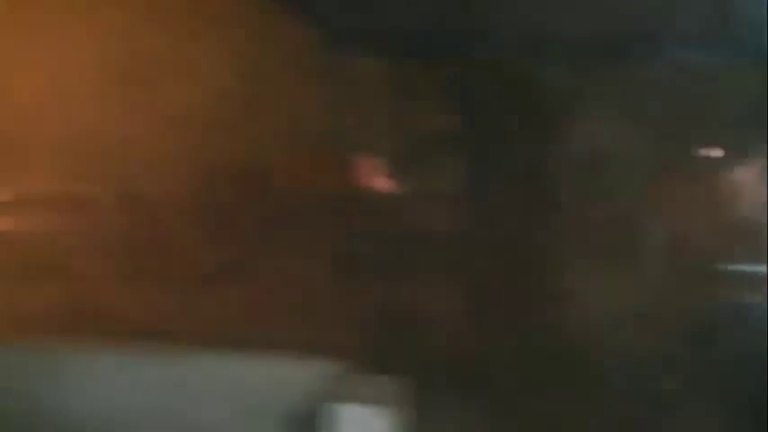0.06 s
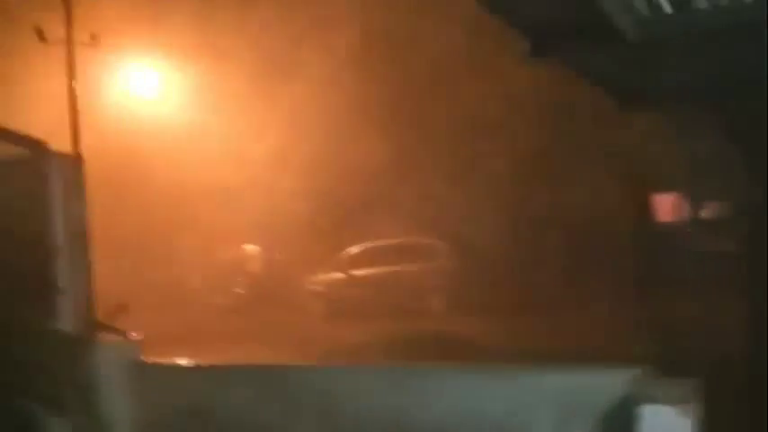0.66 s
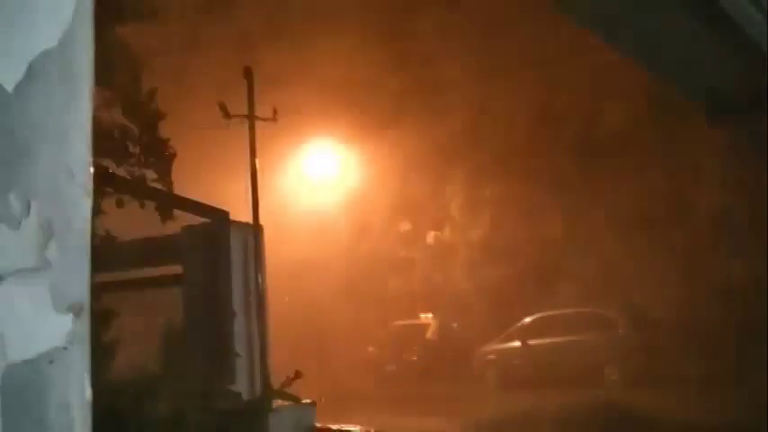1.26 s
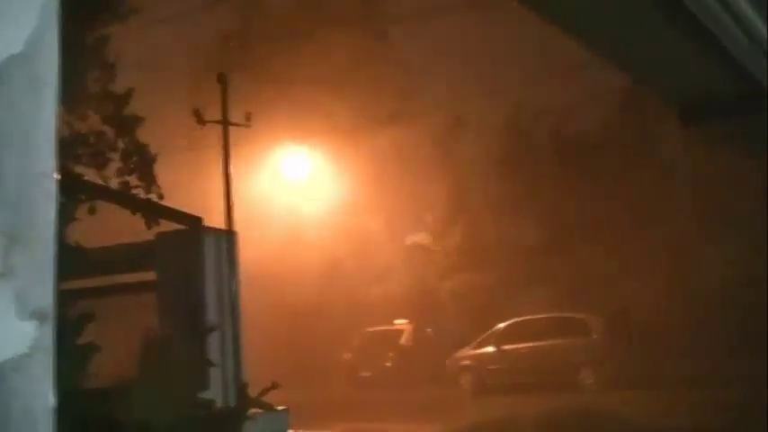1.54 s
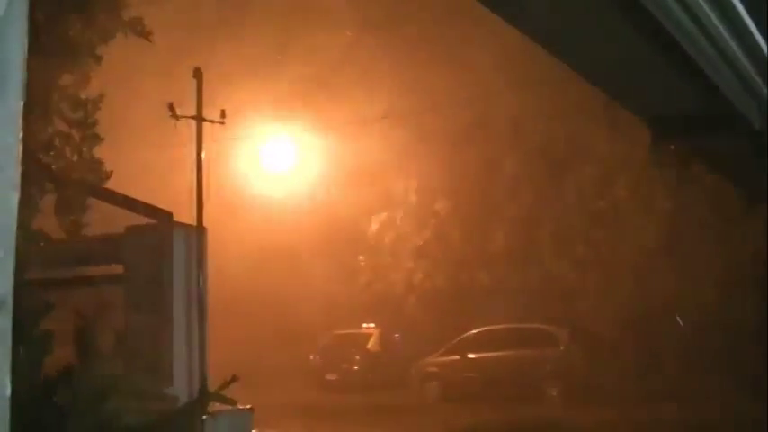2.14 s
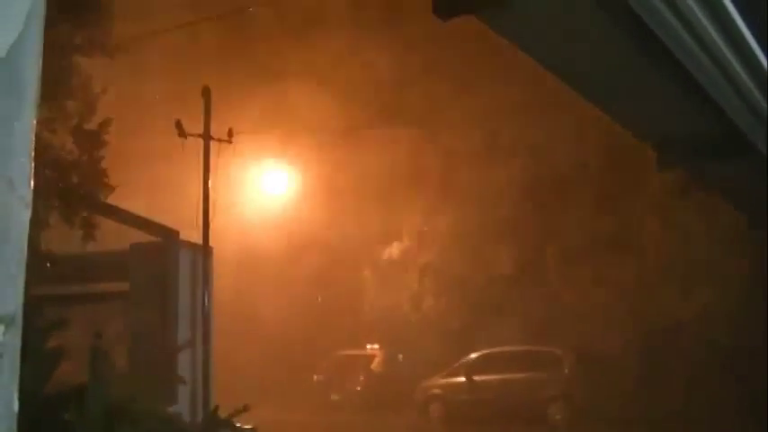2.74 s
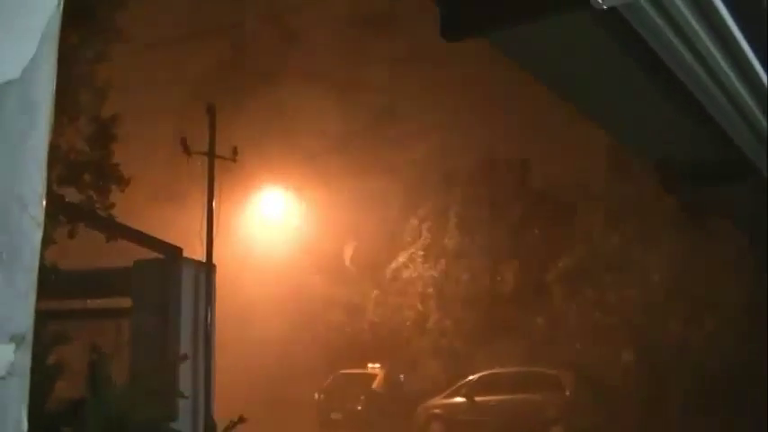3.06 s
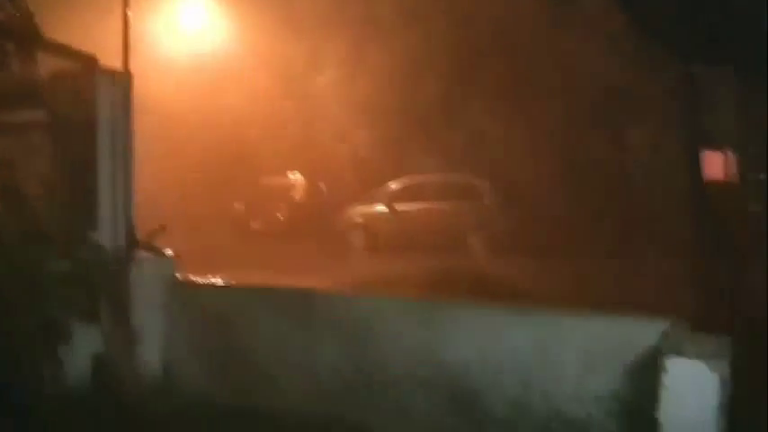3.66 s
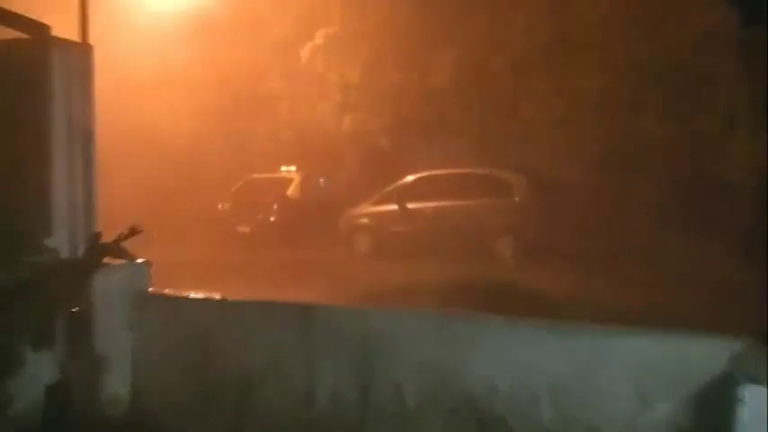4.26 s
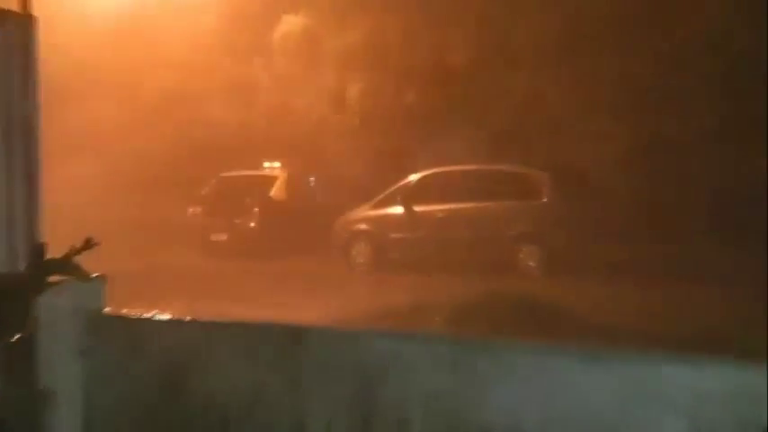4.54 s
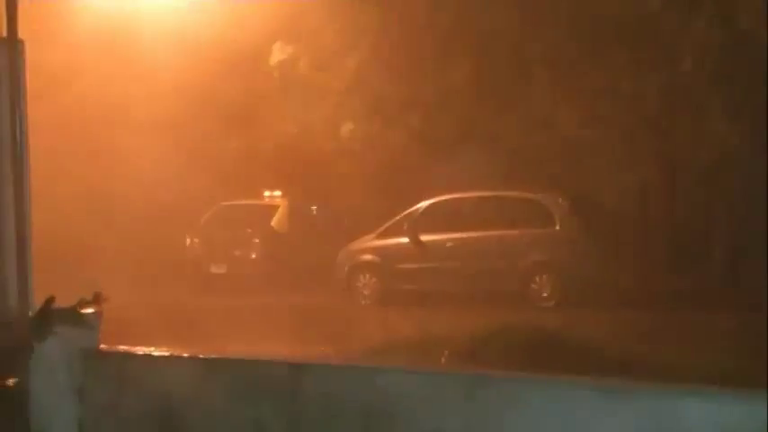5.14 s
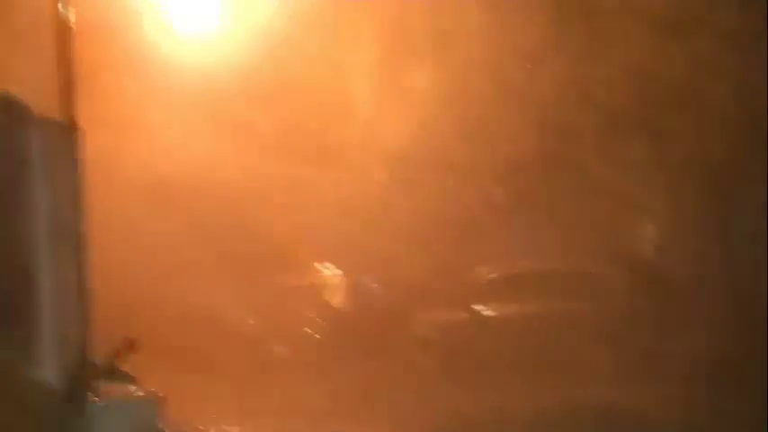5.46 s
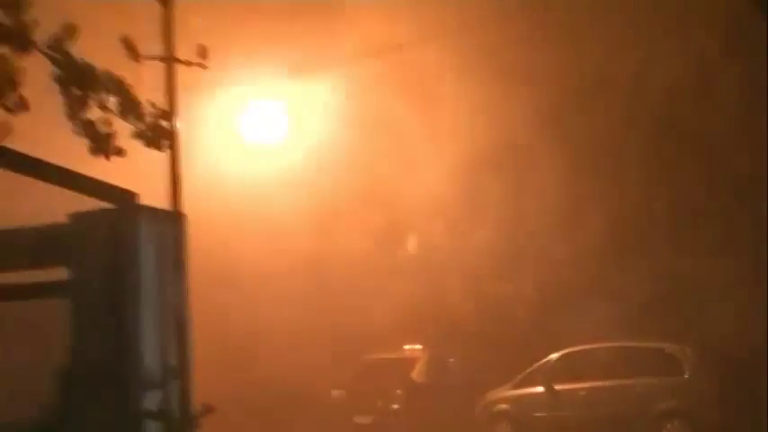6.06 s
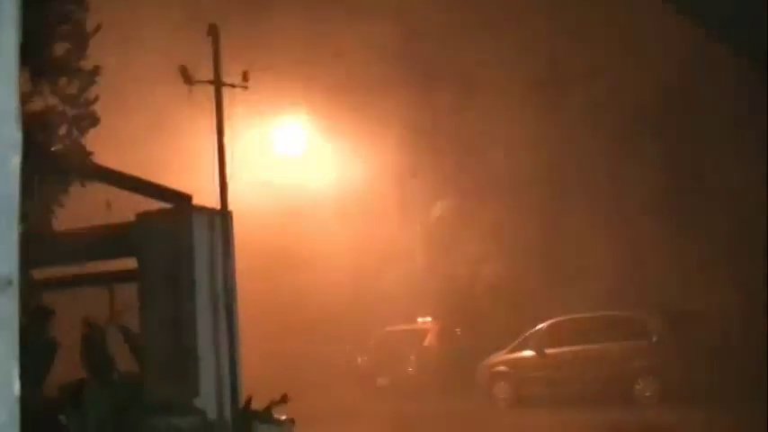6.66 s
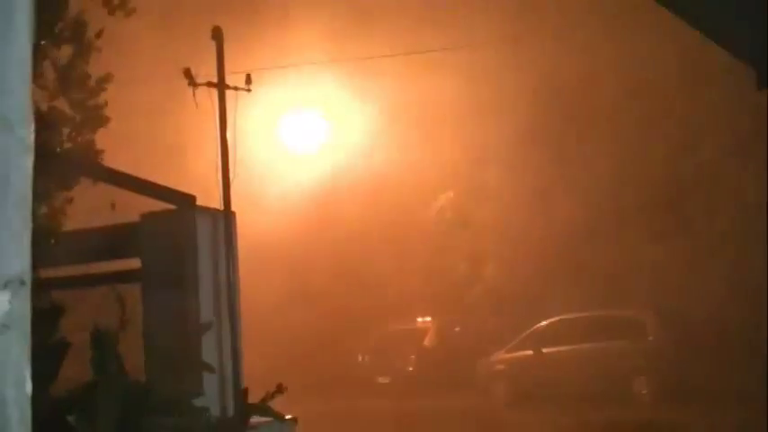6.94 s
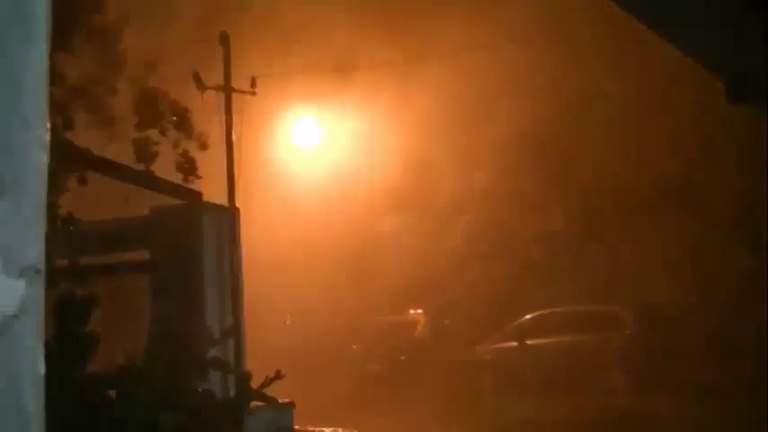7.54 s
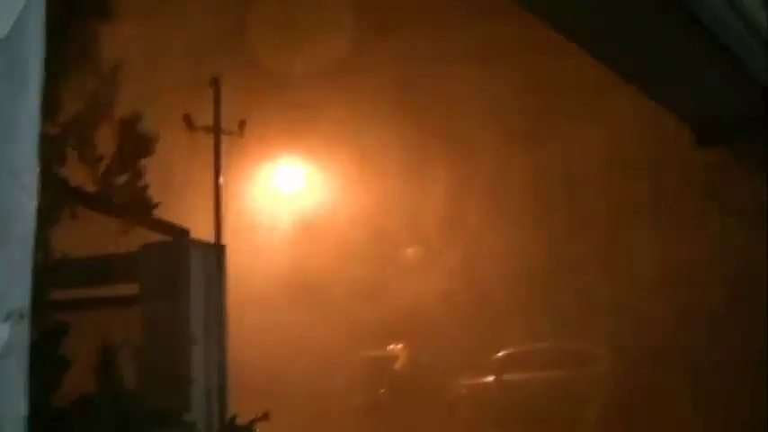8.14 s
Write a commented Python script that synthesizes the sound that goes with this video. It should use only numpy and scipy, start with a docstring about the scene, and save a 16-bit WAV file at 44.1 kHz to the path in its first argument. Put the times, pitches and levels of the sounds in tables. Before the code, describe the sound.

From a porch facing the street, a heavy downpour makes a dense, continuous rush, with close splatter and tiny puddle plinks mixed in. Gusts hit the microphone in irregular low, fluttering bursts from the start, briefly pushing the rain back. The wind then eases while the rain grows a little louder and brighter, before another cluster of gusts arrives. A faint low rumble and occasional lashes of rain against a wall run through it.

```python
"""Under a porch roof, facing a street in a night storm.
Countless far drops merge into a bright roar, coloured by the resonances of the porch. Nearer drops
splatter on hard ground and ring as bubbles in puddles, and heavy sheets lash the wall.
Wind rumbles low behind the rain. Gusts buffet two microphone ports, each with its own eddies,
and under most gusts the rain sinks back."""
import sys
import numpy as np
from scipy import signal
from scipy.fft import rfft, irfft
from scipy.io import wavfile

SR = 44100
rng = np.random.default_rng(int(sys.argv[2]) if len(sys.argv) > 2 else 0)


def to_wav(s):
    """Save 16-bit WAV."""
    ch = np.atleast_2d(s).T  # columns
    pcm = np.round(np.clip(ch, -1, 1) * 32767)  # PCM
    wavfile.write(sys.argv[1], SR, pcm.astype(np.int16))


N = 370440

# spectral density of the rain: frequency_hz, relative_db
RAIN_SPECTRUM = [(50, -50), (100, -27), (200, -18), (400, -8), (600, -5), (750, -3), (1200, -1.55),
                 (1600, -0.5), (2400, -2.5), (3000, -1.5), (3700, -4.5), (4900, -2), (6500, -7.5),
                 (8500, -9), (11000, -14.5)]


def from_db(db):
    """Amplitude ratio of a level in decibels."""
    return 10 ** (np.asarray(db) / 20)


def unit_rms(x):
    """Normalisation to unit mean power."""
    return x / np.sqrt(np.mean(x ** 2) + 1e-20)


def in_time(rows):
    """Linear interpolation of each column of a timed curve at every sample."""
    times_s, *columns = np.transpose(rows)
    return [np.interp(np.arange(N) / SR, times_s, column) for column in columns]


def at_hz(points, hz):
    """Interpolation of a spectrum on a logarithmic frequency axis."""
    known_hz, values = np.transpose(points)
    return np.interp(np.log(np.maximum(hz, 1)), np.log(known_hz), values)


def drift(rate_hz):
    """Low-passed noise: a random fluctuation of unit rms, mostly slower than rate_hz."""
    hop, settling = 40, 2000
    pole = np.exp(-2 * np.pi * rate_hz * hop / SR)
    white = rng.standard_normal(N // hop + settling + 2)
    slow = signal.lfilter([1], [1, -2 * pole, pole * pole], white)[settling:]
    return np.interp(np.arange(N) / hop, np.arange(len(slow)), unit_rms(slow))


def coloured(x, spectrum):
    """Spectral shaping in the frequency domain, to unit rms."""
    hz = np.arange(N // 2 + 1) * SR / N
    return unit_rms(irfft(rfft(x) * from_db(at_hz(spectrum, hz)), N))


def panned(x, left_db):
    """Interaural level difference: the left ear leads the right by left_db."""
    return x * from_db(left_db * np.array([[.5], [-.5]]))


def impacts(per_s, spread_db):
    """A Poisson process of impulses: many small, a few large."""
    sizes = from_db(spread_db * np.minimum(rng.exponential(1, N), 5)) * rng.choice([-1, 1], N)
    return sizes * (rng.random(N) < per_s / SR)


def rain_roar(spray_db, sheet_db, patch_db):
    """Incoherent far drops sum to noise; sheets modulate all bands, patches only neighbouring ones."""
    # likeness of the rain at the two ears: frequency_hz, correlation
    coherence = [(100, 0.98), (300, 1), (600, 0.97), (2500, .93), (6000, 0.92), (10000, 1)]
    # lean of the rain to the left: frequency_hz, left_minus_right_db
    lean = [(100, 1.5), (400, 0.5), (1100, 1.6), (3500, 0)]
    # independent flicker of each band: frequency_hz, spread_db
    flicker = [(130, 4.5), (300, 2), (700, 0.5), (1500, 1.2), (4000, .5), (9000, 0)]
    # fine spray tips the colour towards the treble: frequency_hz, db_per_spray_db
    spray_tilt = [(1200, -1.83), (2600, 0.15), (5000, 0.18), (9000, 0.94)]
    edges_hz = np.geomspace(80, 12500, 25)
    white, sheets, roar = rng.standard_normal((2, 2, N)), drift(22), 0
    for band, (low, high) in enumerate(zip(edges_hz, edges_hz[1:])):
        if band % 4 == 0:  # a patch spans four bands
            patch = drift(18.0)
        hz = np.sqrt(low * high)
        bandpass = signal.butter(2, [low, high], "band", fs=SR, output="sos")
        mid, side = signal.sosfilt(bandpass, white[band % 2])
        alike = np.clip(at_hz(coherence, hz), 0, 1)
        ears = np.sqrt(1 + alike) * mid + np.sqrt(1 - alike) * side * [[1], [-1]]
        colour_db = at_hz(RAIN_SPECTRUM, hz) + spray_db * at_hz(spray_tilt, hz)
        swell_db = sheet_db * sheets + patch_db * patch + at_hz(flicker, hz) * drift(13.5)
        roar = roar + panned(ears, at_hz(lean, hz)) * from_db(colour_db + swell_db)
    return unit_rms(roar)


def splatter(per_s, spread_db, pan_db):
    """Impact noise: near drops strike hard ground in clumps, on either side and ahead."""
    drops = 0
    for place in (-1, 0, 1):
        clumped_per_s = per_s * from_db(3 * drift(7))
        drops = drops + panned(impacts(clumped_per_s, spread_db), place * pan_db)
    return coloured(drops, RAIN_SPECTRUM)


def ring(clicks, hz, t60_s):
    """A damped oscillator: each impulse starts a sinusoid that falls 60 dB in t60_s."""
    radius, angle = from_db(-60 / (t60_s * SR)), 2 * np.pi * hz / SR
    feedback = [1, -2 * radius * np.cos(angle), radius * radius]
    return signal.lfilter([np.sin(angle), -np.sin(angle)], feedback, clicks + 1e-18)


def puddles(per_size_per_s, ring_cycles, spread_db):
    """Bubble resonance: drops trap air in standing water, and each size rings at its own pitch."""
    sizes = 36
    plinks = np.zeros((2, N))
    for hz in np.geomspace(800, 7000, sizes) * from_db(rng.normal(0, .2, sizes)):
        bubbles = unit_rms(ring(impacts(per_size_per_s, spread_db), hz, ring_cycles / hz))
        plinks += panned(bubbles, left_db=rng.normal(0, 2.5))
    return unit_rms(plinks)


def porch(x):
    """Resonances of roof and walls lift a few bands, which makes the rain a little hollow."""
    # porch resonances: centre_hz, width_hz, lift_db
    resonances = [(745, 60, 4), (1180, 260, 2.4), (1800, 50, 1.5), (1997, 120, 3)]
    for hz, width_hz, lift_db in resonances:
        resonant = signal.lfilter(*signal.iirpeak(hz, hz / width_hz, fs=SR), x)
        x = x + (from_db(lift_db) - 1) * resonant
    return x


def wind_rumble(buffet_db, width, sink_db, onset_db, range_db, gap_db):
    """Low wind noise, nearly coherent at the ears; it drops out at random and sinks in hard buffets."""
    # spectral density of the rumble: frequency_hz, relative_db
    spectrum = [(20, -0.5), (45, 4.5), (80, 1.5), (130, 0), (220, 2), (400, -35)]
    air = rng.standard_normal(N) + width * rng.standard_normal(N) * [[1], [-1]]
    struck = np.clip((buffet_db - onset_db) / range_db, 0, 1)
    gaps = np.clip(drift(6.3) - .55, 0, 1)
    return coloured(air, spectrum) * from_db(-gap_db * gaps - sink_db * struck)


def lashes():
    """Dense impacts fuse: a sheet of big drops hits the wall as a short, dull rush."""
    # Gaussian swells of heavy rain: centre_s, half_length_s, level_db
    sheets = [(0.013, 0.042, -31), (0.103, 0.071, -31), (1.795, 0.018, -28), (2.144, 0.014, -27),
              (2.263, 0.013, -25), (3.664, 0.039, -30.5), (3.888, 0.016, -25.5), (4.522, 0.035, -27),
              (5.237, 0.041, -29), (7.015, 0.02, -30)]
    # spectral density of a lash: frequency_hz, relative_db
    spectrum = [(80, -60), (300, -33), (750, -3.5), (1200, 2), (2000, 2), (3000, -19), (8000, -17.5)]
    t = np.arange(N) / SR
    swell = sum(from_db(level_db) * np.exp(-((t - centre_s) / half_length_s) ** 2)
                for centre_s, half_length_s, level_db in sheets)
    return swell * coloured(impacts(per_s=9000, spread_db=2.5), spectrum)


def lagged_pulses(starts_s, lengths_s, heights, lag_s):
    """First-order lag: rectangular pulses add, rising and dying away with one time constant."""
    steps = np.zeros(N)
    for start, length, height in zip(starts_s, lengths_s, heights):
        steps[int(start * SR):int((start + length) * SR)] += height
    pole = np.exp(-1 / (lag_s * SR))
    return signal.lfilter([1 - pole], [1, -pole], steps + 1e-18)


def gusts():
    """Gusts superpose on a light breeze; gives the wind level and the rain's slower dip, both in dB."""
    # gusts striking the ports (a negative dip lifts the rain): start_s, length_s, level_db, dip_db
    buffets = [(0.145, 0.5, -37.5, 2.5), (0.28, 0.24, -44, 2), (0.42, 0.11, -48, 1.5),
               (0.68, 0.088, -37, -0.5), (1.06, 0.16, -44, 1.5), (1.177, 0.25, -44.5, 3.5),
               (1.62, 0.044, -39, 0), (1.7, 0.16, -44, 1), (1.847, 0.1, -33.5, 2.5),
               (1.98, 0.044, -35.5, 2.5), (2.152, 0.027, -29.5, 7), (2.298, 0.11, -35, 4),
               (2.444, 0.054, -36, 2.5), (2.592, 0.047, -36, 5), (3.281, 0.075, -43.5, 4.5),
               (3.441, 0.051, -45, 4), (3.518, 0.034, -36, 3), (5.85, 0.03, -42, 1), (6.31, 0.053, -38, 2),
               (6.665, 0.032, -35, 7), (6.76, 0.048, -34.5, 1.5), (6.796, 0.11, -35, 8.5),
               (6.92, 0.06, -43, 1.5), (7.038, 0.023, -43, 3), (7.138, 0.025, -43, 3),
               (7.283, 0.025, -47, 3), (7.605, 0.025, -37, -2), (7.932, 0.037, -49, 0)]
    starts_s, lengths_s, level_db, dip_db = np.transpose(buffets)
    breeze = from_db(-57 + 3 * drift(rate_hz=7.2))
    strength = breeze + lagged_pulses(starts_s, lengths_s, from_db(level_db), lag_s=0.009)
    return 20 * np.log10(strength), lagged_pulses(starts_s, lengths_s, dip_db, lag_s=0.021)


def port_wind(lump_db, lump_rate_hz, pop_db, crosstalk):
    """Turbulent pressure: eddies burst on each port as lumpy noise and pops; a little crosses over."""
    # spectral density of the turbulence at the ports: frequency_hz, relative_db
    spectrum = [(50, -43), (100, -17), (170, -6), (300, -1), (480, -2), (700, -8), (1100, -14), (2000, -33),
                (4000, -60)]
    eddies = np.zeros((2, N))
    for port in range(2):
        white = rng.standard_normal(N)
        lumps = 2 * np.tanh(drift(lump_rate_hz) / 2)  # the extremes are softly limited
        eddies[port] = white * from_db(lump_db * lumps)
    pops = np.array([impacts(per_s=110, spread_db=5.0) for port in range(2)])
    ports = unit_rms(eddies) + from_db(pop_db) * unit_rms(pops)
    return coloured(ports + crosstalk * ports[::-1], spectrum)


def scene():
    """Superposition: rain and rumble share a level that dips in gusts; lashes and port wind lie on top."""
    # slow swell of the downpour, from heavy drops to fine spray: time_s, gain_db, brightness_db
    downpour = [(0.0, -23, -1), (0.8, -23, 0.5), (1.03, -20, -0.5), (1.6, -20, 0.7), (2.1, -22, -0.5),
                (2.55, -23, -0.5), (2.9, -20, -1.5), (3.2, -22, 1), (3.8, -20, -0.4), (4.5, -20, 0),
                (4.7, -20.5, 0.5), (5.17, -18.5, 2.5), (5.45, -20, 0.8), (6.1, -20, 0.8), (6.7, -20, 0.7),
                (7.1, -20, 0.5), (7.9, -19.5, 0.6), (8.4, -20.5, 0.5)]
    rain_db, spray_db = in_time(downpour)
    buffet_db, dip_db = gusts()
    rain = from_db(-4.0) * rain_roar(spray_db, sheet_db=0.54, patch_db=0.74)
    rain += from_db(-12.5) * splatter(per_s=1500, spread_db=3.5, pan_db=-2.0)
    rain += from_db(-14.0) * puddles(per_size_per_s=8, ring_cycles=98, spread_db=1.0)
    wind = from_db(buffet_db) * port_wind(lump_db=3.0, lump_rate_hz=50, pop_db=-6.5, crosstalk=.1)
    rumble = wind_rumble(buffet_db, width=0.13, sink_db=17, onset_db=-39.5, range_db=9, gap_db=20)
    storm = porch(rain) + from_db(-32.8) * rumble
    return from_db(rain_db - dip_db) * storm + porch(lashes()) + wind


def record(dry):
    """Band limiting: an elliptic low-pass filter cuts the top steeply."""
    cutoff_hz = 10900
    return signal.sosfilt(signal.ellip(14, .1, 90, cutoff_hz, fs=SR, output="sos"), dry)


dry = scene()
out = record(dry)
to_wav(out)
```